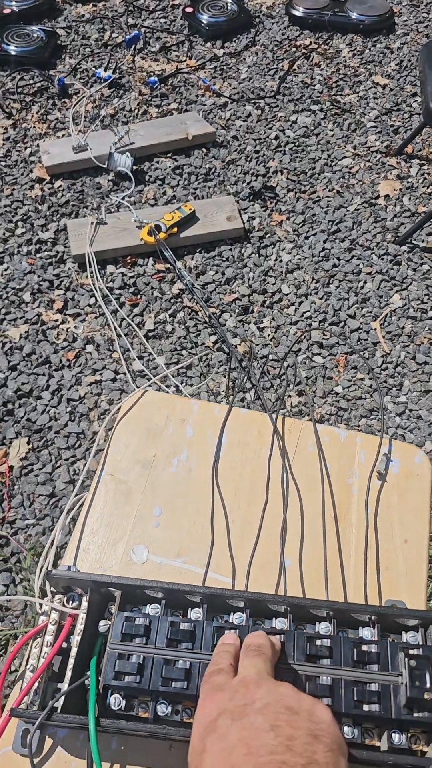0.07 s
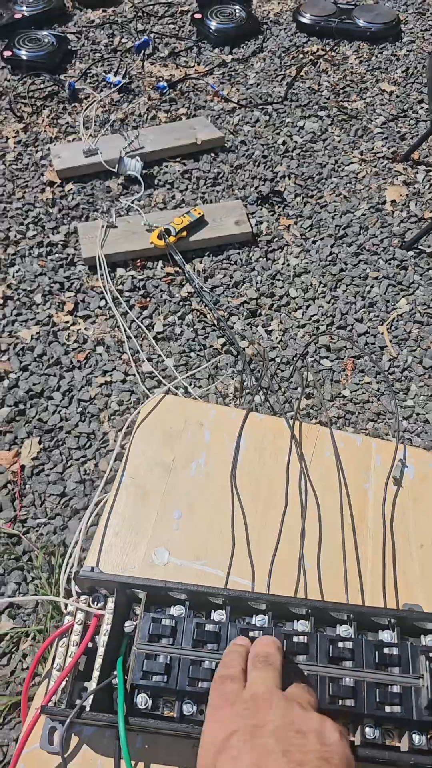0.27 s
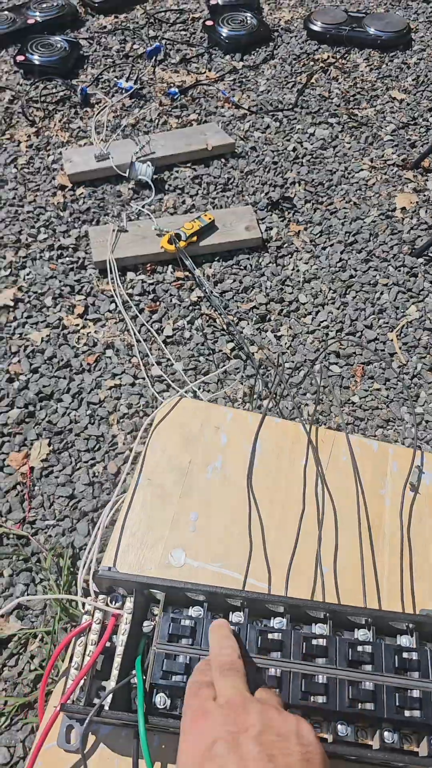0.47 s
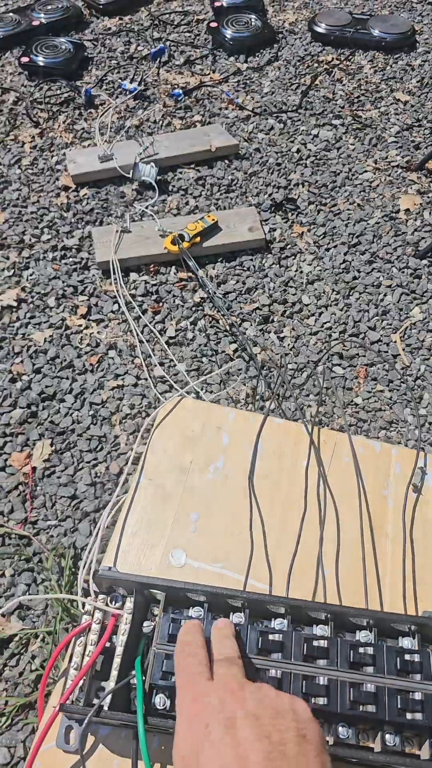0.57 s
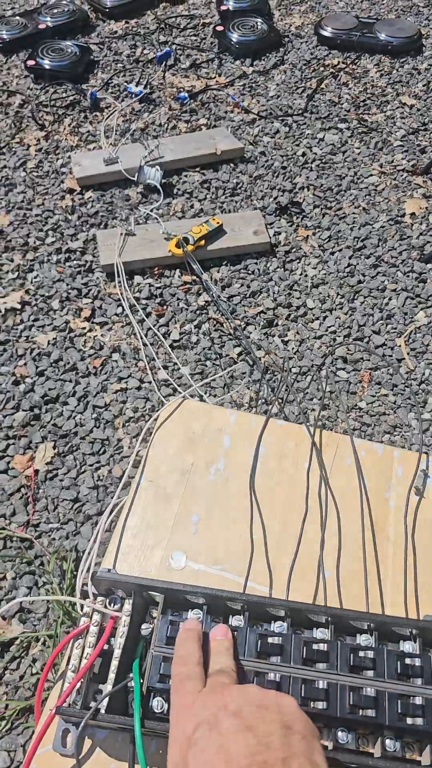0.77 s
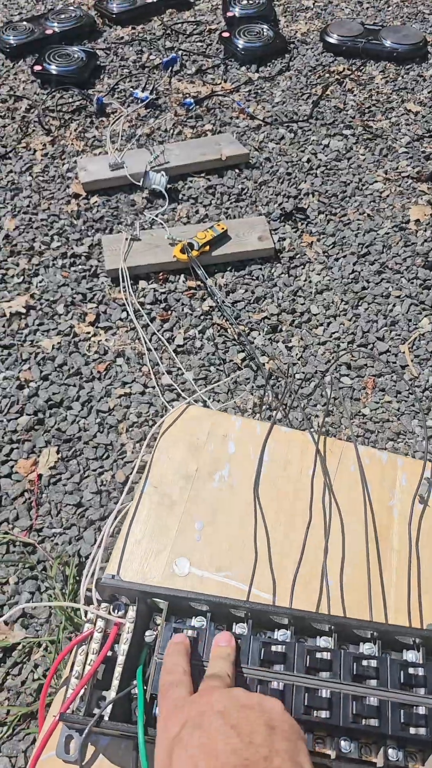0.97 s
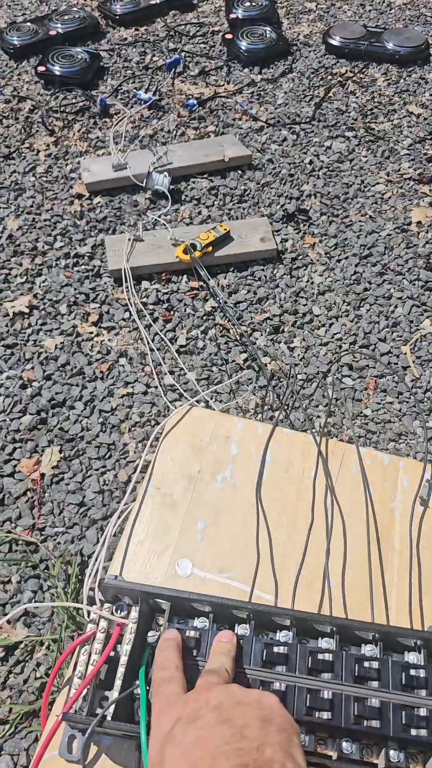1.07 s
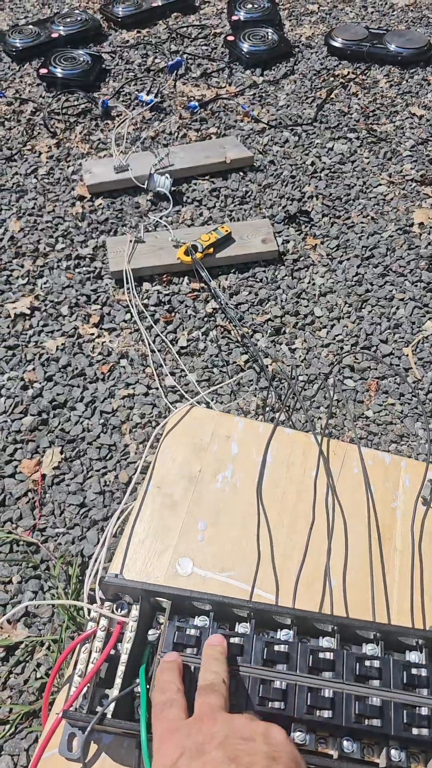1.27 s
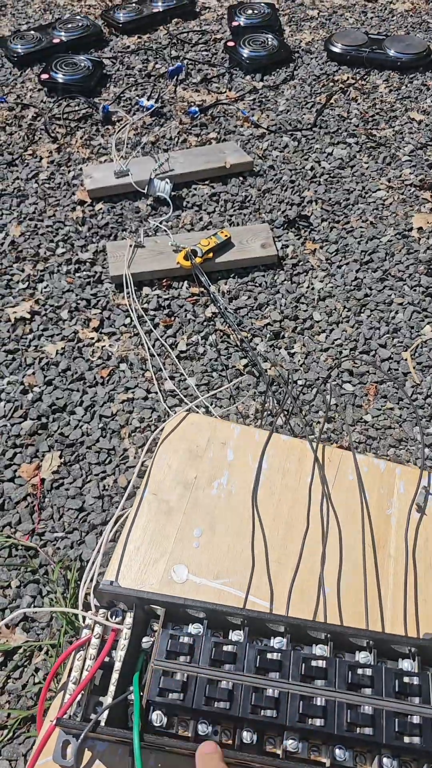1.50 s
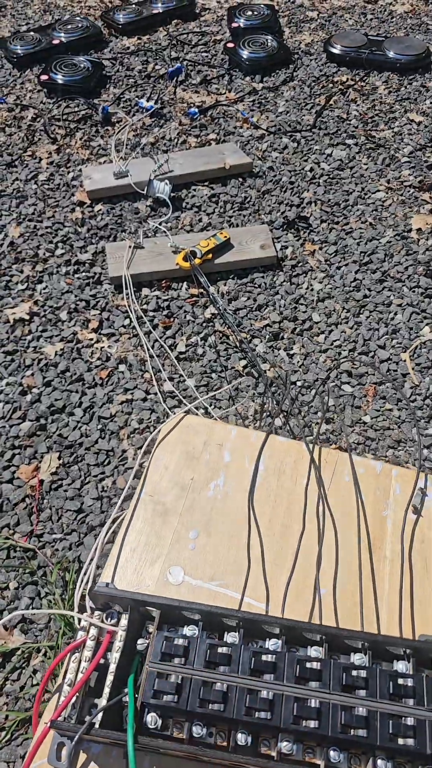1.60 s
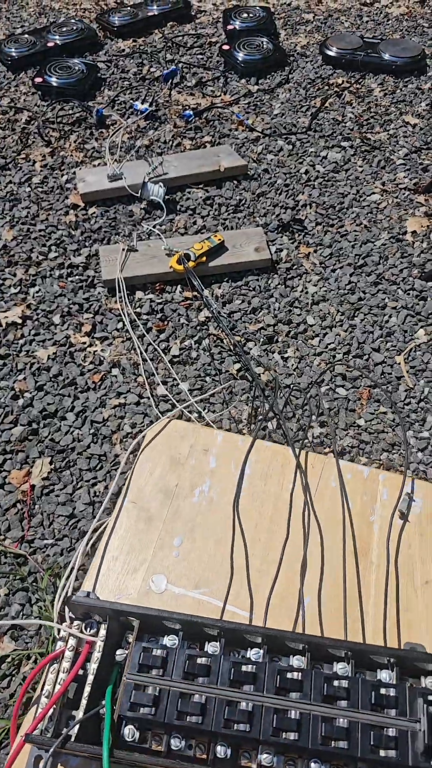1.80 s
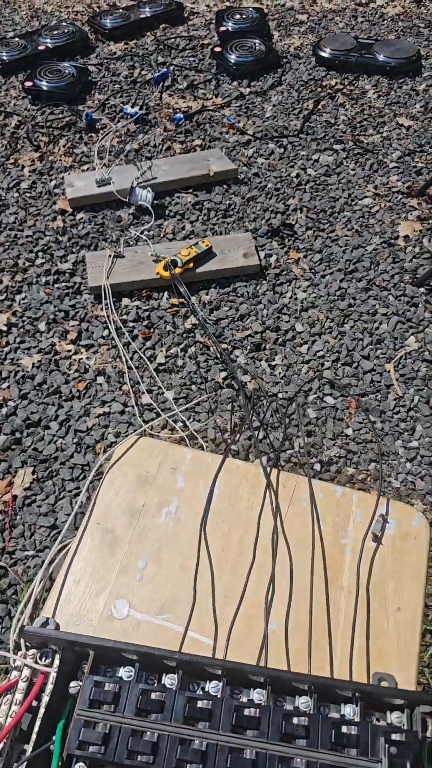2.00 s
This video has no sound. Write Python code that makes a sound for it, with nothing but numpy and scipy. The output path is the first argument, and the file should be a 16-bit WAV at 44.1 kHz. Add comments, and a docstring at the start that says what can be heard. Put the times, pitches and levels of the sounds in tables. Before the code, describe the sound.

Circuit breakers are snapped over by hand, close and dry outdoors. After tiny finger ticks, two bright, hard cracks come at 0.21 and 0.24 s. Small handling ticks lead to a softer, duller clack at 0.88 s, then a firm snap with hollow plastic knock at 1.21 s. Around 1.75-1.85 s a faint gravel shuffle and hiss swell. Very quiet air, throbbing low hum and thin wavering whine continue throughout.

```python
"""Outdoor air hisses, an engine-like hum throbs low and two thin tones whine from start to end.
Fingers tick on the handles, then at 0.2 s two breakers snap in quick succession; more snap at 0.9 and 1.2 s.
Each snap is a noisy crack of contact chatter that sets off bright rings and the hollow plastic row,
made of dying sines; small ticks (filtered noise) and springy knocks (sines) come around the snaps.
From 1.74 s a short shuffle on gravel, made of random thuds, is heard as the treble of the air swells."""
import sys
import numpy as np
from scipy import signal
from scipy.io import wavfile
from scipy.ndimage import uniform_filter1d

SR = 44100
rng = np.random.default_rng(int(sys.argv[2]) if len(sys.argv) > 2 else 0)


def dump_mix(stems):
    """Bounce the given channels to the path in sys.argv[1] as a 16-bit WAV at rate SR."""
    frames = np.atleast_2d(stems).T  # one column per channel
    limited = np.clip(frames, -1, 1)  # hard clip at full scale
    pcm = np.round(limited * 32767).astype(np.int16)
    wavfile.write(sys.argv[1], SR, pcm)


N = 90404  # length of the scene in samples


def amp(db):
    """Turn decibels into a plain multiplier: 20 dB is ten times the amplitude."""
    return 10 ** (np.asarray(db) / 20)


def evened(x):
    """Scale a signal to an average strength (rms) of 1."""
    return x / np.sqrt(np.mean(x ** 2) + 1e-20)


def read_curve(points, hz):
    """Read a curve between its points, with pitch spaced as the ear hears it (logarithmically)."""
    f, value = np.transpose(points)
    return np.interp(np.log(hz + 1), np.log(f + 1), value)


def add(mix, start_s, sound):
    """Lay a sound into the mix from a given moment, cutting it off at the end."""
    part = mix[..., round(start_s * SR):][..., :sound.shape[-1]]
    part += sound[..., :part.shape[-1]]


def mode(t, hz, db, t60):
    """One way a solid rings: a sine that dies by 60 dB in t60 seconds."""
    return amp(db - 60 * t / t60) * np.sin(2 * np.pi * hz * t)


def band(x, hz, width):
    """One resonance of gain about 1, width in Hz; at 0 Hz it is a low-pass of gain 2, cutoff width / 2."""
    r = np.exp(-np.pi * width / SR)
    return 2 * signal.lfilter([1 - r], [1, -r * np.exp(2j * np.pi * hz / SR)], x).real


def colour(x, points):
    """Filter with a given gain curve, with no sound before its cause (minimum phase)."""
    gain_db = read_curve(points, abs(np.fft.fftfreq(4096, 1 / SR)))
    log_gain = np.log(amp(gain_db))
    taps = np.fft.ifft(np.exp(np.conj(signal.hilbert(log_gain)))).real[:1024]
    return signal.oaconvolve(x, taps)[:len(x)]


def crack_and_tails(t, noise, dull_noise, grain_db, length, treble_db, late_db):
    """Contact chatter: a short crack of noise, then a grainy tail and a longer dull tail."""
    tail_db, tail_t60 = -14, 0.07  # dB, s
    late_hz, late_t60 = 5760, 0.36  # filter width in Hz, s
    soft = band(noise, 0, 17000) / 2
    treble = noise - soft
    crack = np.exp(-(t / length) ** 2) * (soft + amp(treble_db) * treble)
    tail = amp(tail_db + grain_db - 60 * t / tail_t60) * evened(band(noise, 0, 6800))
    dull = evened(band(band(dull_noise, 0, late_hz), 0, 2 * late_hz))
    dull = dull * amp(late_db - 60 * t / late_t60)
    attack = np.minimum(t / 0.0003, 1)  # rises in 0.3 ms
    return attack * (crack + tail + dull)


def bright_rings(t, rough_noise, length, short_hz, short_db, long_hz, long_db):
    """Two high rings: one stops with the chatter, the other lasts longer and flutters roughly."""
    rise_s, roughness = 0.00085, 0.34
    short = mode(t, short_hz, short_db, 0.046) * np.exp(-(t / length) ** 2)
    rough = 1 + roughness * evened(band(rough_noise, 0, 1000))
    long = rough * mode(t, long_hz, long_db, 0.035)
    return (1 - np.exp(-(t / rise_s) ** 2)) * (short + long)


def panel_thump(t, blow_noise, grain_db):
    """The breaker row is shaken by a short noisy blow, then by loose parts rattling in uneven bursts."""
    # ways the plastic row rings: f/Hz, level/dB, time to die by 60 dB/s
    row_modes = [(205, -13.5, 0.03), (490, -6.5, .05), (655, -3.5, 0.05), (780, -3.5, 0.036),
                 (1308, 2, 0.017), (1785, -3.5, 0.029), (2366, -13, 0.065)]
    blow_s, rattle_db, rattle_t60 = 0.007, -13, 0.1  # s, dB, s
    panel = sum(mode(t, *row) for row in row_modes)
    panel = panel - band(panel, 0, 270) / 2  # take out the lowest bass
    rattle = amp(rattle_db + grain_db - 60 * t / rattle_t60)
    blow = blow_noise * (np.exp(-t / blow_s) + rattle)
    return signal.fftconvolve(blow / np.linalg.norm(blow), panel)[:len(t)]


def snaps(t, chatter, ring, body):
    """Each flip strikes the contacts, which chatter and set the bright rings and the row going."""
    # moments when the breakers snap: t/s
    snap_times = (0.2086, 0.2352, 0.8759, 1.2089)
    # one row a snap: chatter level/dB before colouring, chatter length/s, treble/dB in the crack,
    # short ring f/Hz, its level/dB, long ring f/Hz, its level/dB, row level/dB,
    # dull late tail/dB relative to the chatter level
    snap_rows = [(-16.5, 0.0017, -6, 4950, -3, 4160, -19, -34, -33),
                 (-16.5, 0.003, 2, 4720, -13, 4080, -11, -32.5, -36.5),
                 (-27, 0.0048, 2, 3000, -22.5, 4300, -24, -34, -32),
                 (-18, 0.0027, -20.5, 4810, -6, 4200, -44.5, -25.5, -35.5)]
    shared = 0.78  # likeness of the crack noise at the two microphones
    grain_width, grain_depth_db = 248, 3  # Hz, dB: unevenness of tail and rattle
    lead_s, lead_db = 0.0025, -19.5  # a faint noise grows just before the snap
    for start_s, row in zip(snap_times, snap_rows):
        db, length, treble_db, short_hz, short_db, long_hz, long_db, panel_db, late_db = row
        a, b, c, d, e = rng.standard_normal((len(t), 5)).T
        noise = np.array([a, shared * a + np.sqrt(1 - shared ** 2) * b])
        grain_db = grain_depth_db * evened(band(band(e, 0, grain_width), 0, grain_width))
        cracks = crack_and_tails(t, noise, np.array([c, d]), grain_db, length, treble_db, late_db)
        add(chatter, start_s, amp(db) * cracks)
        lead = (t < lead_s) * t / lead_s * noise[:, ::-1]
        add(chatter, start_s - lead_s, amp(db + lead_db) * lead)
        add(ring, start_s, bright_rings(t, d, length, short_hz, short_db, long_hz, long_db))
        add(body, start_s, amp(panel_db) * panel_thump(t, c, grain_db))


def ticks(t, chatter):
    """Tiny ticks from fingers and handles, and from the contacts bouncing after the third snap: bursts of noise
    around one pitch, alike on both sides."""
    # small ticks: t/s, level/dB before colouring, f/Hz, length/s (fall to about a third)
    small_ticks = [(0.182, -62, 3940, 0.0058), (0.1928, -51.5, 4200, 0.0055), (0.767, -54, 1230, .01),
                   (0.774, -62.5, 9810, 0.0026), (0.821, -56, 9550, 0.0024), (0.8311, -62.5, 3700, 0.0074),
                   (0.8335, -48, 1323, .004), (0.8523, -50, 3300, 0.0024), (0.853, -48, 1250, 0.0047),
                   (0.893, -50, 3140, 0.0077), (0.908, -55.5, 3040, 0.0058), (1.028, -41, 760, 0.0034),
                   (1.029, -65, 1962, 0.0054), (1.125, -67, 4460, 0.0039), (1.1945, -55.5, 2980, 0.0037),
                   (1.757, -49, 4340, 0.0018), (1.815, -49.5, 13100, .002)]
    for start_s, db, hz, length in small_ticks:
        noise = band(band(rng.standard_normal(len(t)), hz, 0.35 * hz), hz, 0.4 * hz)
        noise = noise / np.sqrt(np.mean(noise[t < length] ** 2))
        add(chatter, start_s, amp(db) * np.exp(-t / length) * noise * np.ones((2, 1)))


def knocks(t, body):
    """Springs and soft knocks: sines that swell in, hold briefly and then die away."""
    # springs and knocks: t/s, level/dB, f/Hz, hold/s, time to die by 60 dB after the hold/s
    soft_knocks = [(0.209, -44.5, 469, 0.02, 0.17), (0.2093, -29.5, 1336, 0.0032, .04),
                   (0.247, -46.5, 648, 0.0097, 0.09), (0.8711, -24, 379.8, 0.045, 0.034),
                   (1.034, -48, 460, 0.0079, 0.02), (1.194, -49.5, 420, 0.0057, .04),
                   (1.2073, -31.5, 388.3, 0.013, 0.053), (1.21, -25.5, 766.6, .005, .04),
                   (1.232, -43, 609, 0.0045, .03), (1.246, -54, 662, 0.019, 0.2),
                   (1.784, -48, 313, 0.0021, 0.016), (1.808, -56, 150, .008, 0.069),
                   (1.814, -58.5, 379, 0.006, 0.2)]
    for start_s, db, hz, hold, t60 in soft_knocks:
        # time spent fading: near 0 during the hold, with a rounded corner at its end
        fading_s = (np.hypot(t - hold, 0.35 * hold) + t - hold) / 2
        rise = 1 - np.exp(-(t / (0.25 * hold)) ** 2)
        add(body, start_s, rise * mode(t, hz, 0, np.inf) * amp(db - 60 * fading_s / t60))


def breakers():
    """Sum up the breaker sounds at two microphones: each colours the chatter, the left hears them later."""
    # gain for the chatter at each microphone: f/Hz, level/dB
    left_colour = [(50, -35), (200, -3.5), (1000, -4.5), (2400, -1.5), (3500, -6), (5000, -2), (7000, 4),
                   (9000, -5), (13000, -8.5), (16000, -7)]
    right_colour = [(50, -24), (200, -26.5), (1000, -7), (2400, -11.5), (4400, 12), (5500, 4.5),
                    (6800, -22.5), (9000, -23.5), (12500, 4), (16000, -13)]
    ring_left_db, body_left_db, left_lag_s = -17.5, -3.5, 0.00018
    t = np.arange(SR // 2) / SR
    chatter, ring, body = np.zeros((2, N)), np.zeros(N), np.zeros(N)
    snaps(t, chatter, ring, body)
    ticks(t, chatter)
    knocks(t, body)
    left = colour(chatter[0], left_colour) + amp(ring_left_db) * ring + amp(body_left_db) * body
    right = colour(chatter[1], right_colour) + ring + body
    return np.array([np.roll(left, round(left_lag_s * SR)), right])


def shuffle():
    """Weight shifts on gravel: dense random hits pass through a low resonance, making dull thuds."""
    # when the shuffle is heard: start t/s, end t/s
    shuffle_span = (1.735, 1.85)
    thuds_per_s, thud_hz, thud_width, thud_db = 1200, 327, 380, -59.5  # 1/s, Hz, Hz, dB
    t = np.arange(N) / SR
    start_s, end_s = shuffle_span
    progress = np.clip((t - start_s) / (end_s - start_s), 0, 1)
    swell = np.sin(np.pi * progress) ** 0.34
    hits = rng.standard_normal(N) * (rng.random(N) < thuds_per_s / SR)
    thuds = evened(band(band(hits, thud_hz, thud_width), 0, 1600))
    return amp(thud_db) * swell * thuds * amp([[-3.5], [0]])  # left, right in dB


def hum():
    """A distant engine's low note: a sine whose pitch wavers slowly and whose loudness throbs."""
    hum_hz, waver_hz, hum_db = 75, 1.6, -67.5
    throbs_per_s, throb_depth = 2.4, 0.71
    pitch_drift, throb_drift = [evened(uniform_filter1d(v, size=6000))
                                for v in rng.standard_normal((N, 2)).T]
    throb_turn = np.cumsum(throbs_per_s * (1 + 0.14 * throb_drift)) / SR
    throb = 1 + throb_depth * np.sin(2 * np.pi * throb_turn)
    note = throb * np.sin(2 * np.pi * np.cumsum(hum_hz + waver_hz * pitch_drift) / SR)
    return amp(hum_db) * evened(note) * amp([[-2.5], [0]])  # left, right in dB


def whine():
    """Two thin sines waver and flutter together; the lower one drifts in level on each side."""
    # level of the lower tone before the flutter: t/s, left level/dB, right level/dB
    whine_levels = [(0, -70, -67.5), (.15, -60.5, -62), (.3, -56.5, -60), (0.451, -68.5, -62),
                    (0.581, -74.5, -76.5), (.68, -87, -88), (.88, -88, -69.5), (1, -66.5, -74),
                    (1.18, -64.5, -67.5), (1.329, -78, -75.5), (1.5, -67, -71), (1.65, -70, -72),
                    (1.86, -84.5, -83.5), (1.91, -75.5, -67.5), (2.05, -75, -68)]
    lower_hz, upper_hz, waver_hz = 1392, 1491, 2.5
    upper_db, flutter_db, left_lag = -86.5, 3.5, 1.9  # dB, dB, radians
    t = np.arange(N) / SR
    time_s, left_db, right_db = np.transpose(whine_levels)
    waver, flutter = (evened(uniform_filter1d(v, size=2000)) for v in rng.standard_normal((N, 2)).T)
    turn = 2 * np.pi * np.cumsum(lower_hz + waver_hz * waver) / SR
    upper = amp(upper_db) * np.sin(turn * upper_hz / lower_hz)
    left = amp(np.interp(t, time_s, left_db)) * np.sin(turn - left_lag) + upper
    right = amp(np.interp(t, time_s, right_db)) * np.sin(turn) + 0.97 * upper
    return np.sqrt(2) * amp(flutter_db * flutter) * np.array([left, right])  # sqrt(2): levels are rms


def air():
    """Outdoor hiss and rumble: noise shaped pitch by pitch; bass, middle and treble swell apart."""
    # colour of the air at each microphone, before the overall level: f/Hz, level/dB
    left_air = [(25, 5), (90, -2.5), (400, -18), (900, -13.5), (2000, -14), (2900, -30.5), (5300, -30.5),
                (6500, -33), (10000, -39), (15500, -33), (15900, -59.5)]
    right_air = [(25, 13), (80, 13), (95, -9), (400, -10), (650, -14.5), (1000, -25.5), (1700, -18.5),
                 (2500, -30.5), (4400, -17.5), (5400, -27), (6100, -50), (9000, -40), (15500, -30.5),
                 (15900, -62.5)]
    # likeness of left and right: f/Hz, likeness (1 the same, 0 unrelated, below 0 opposed)
    side_likeness = [(25, 1), (70, -0.11), (300, 0.99), (700, 0.78), (1400, -0.42), (3000, -0.2)]
    # how the air swells: t/s, bass level/dB, middle level/dB, treble level/dB
    air_swell = [(0, 3.5, 0.5, 3), (0.201, 1.5, 4, -6), (.34, 10.5, 7, 9), (.5, -3, 1, -1),
                 (0.649, -9.5, 1, -6), (.8, 1, 3.5, 2), (.95, 4.5, 4.5, 0), (1.15, -2.5, 4, -2.5),
                 (1.349, 0.5, 3.5, 1.5), (1.721, -3.5, 4, 3), (1.79, -4.5, 13.5, 18), (1.86, -6.5, 6.5, 13),
                 (1.948, -6.5, 7.5, 7.5), (2.05, 6.5, 6, 5.5)]
    air_db, patch_db = -73, 0.73
    bass_hz, middle_hz, treble_hz = 70, 2500, 12000
    frames, hz = N // 256 + 5, np.fft.rfftfreq(1024, 1 / SR)
    a, b, c, d, patches = rng.standard_normal((frames, 513, 5)).T
    # random patches of slightly louder and softer noise, smooth over pitch and time
    patches = uniform_filter1d(patches, size=12, axis=0)
    patches = evened(uniform_filter1d(patches, size=10, axis=1))
    time_s, *levels = np.transpose(air_swell)
    frame_s = np.arange(frames) * 256 / SR
    levels = np.array([np.interp(frame_s, time_s, v) for v in levels])
    # how much each pitch follows bass, middle and treble
    knots = np.log([bass_hz, middle_hz, treble_hz])
    shares = np.array([np.interp(np.log(hz + 1), knots, row) for row in np.eye(3)]).T
    same = np.clip(read_curve(side_likeness, hz), -1, 1)[:, None]
    left = a + 1j * b
    right = same * left + np.sqrt(1 - same ** 2) * (c + 1j * d)
    spectrum = np.array([left * amp(read_curve(left_air, hz))[:, None],
                         right * amp(read_curve(right_air, hz))[:, None]])
    spectrum = spectrum * amp(air_db + shares @ levels + patch_db * patches)
    return signal.istft(spectrum, nperseg=1024, noverlap=768)[1][:, :N]


def scene():
    """Add up the breakers, the shuffle and the steady background."""
    return breakers() + shuffle() + hum() + whine() + air()


def record(dry):
    """Cut everything above about 16.7 kHz with a steep low-pass filter."""
    taps = signal.firwin(255, 16700, window=("kaiser", 9), fs=SR)
    return signal.oaconvolve(dry, taps[None], "same")


dry = scene()
out = record(dry)
dump_mix(out)
```